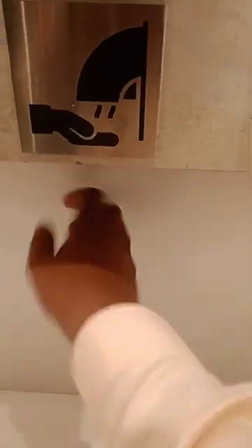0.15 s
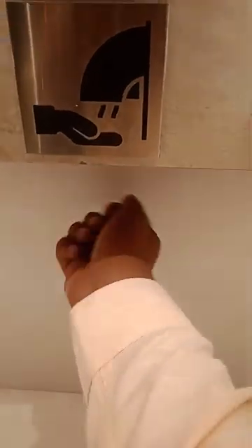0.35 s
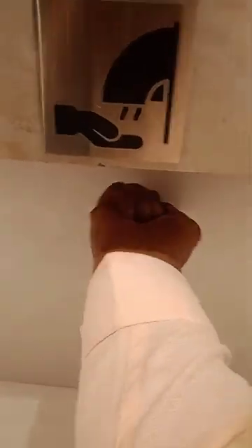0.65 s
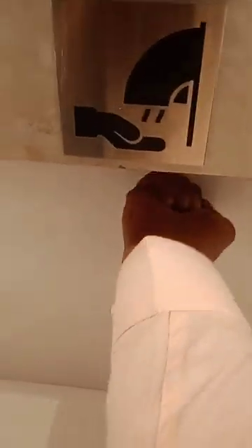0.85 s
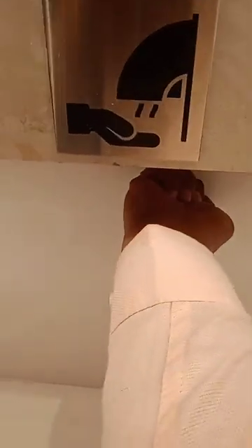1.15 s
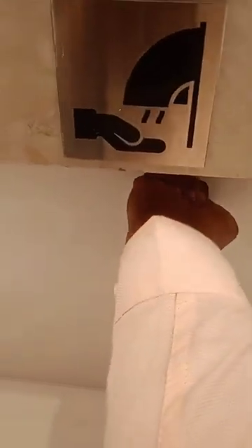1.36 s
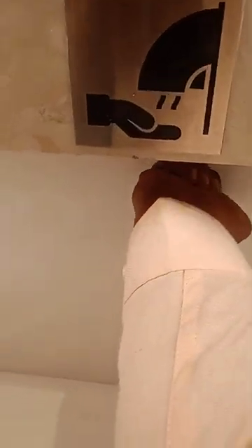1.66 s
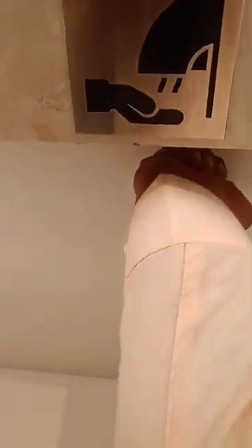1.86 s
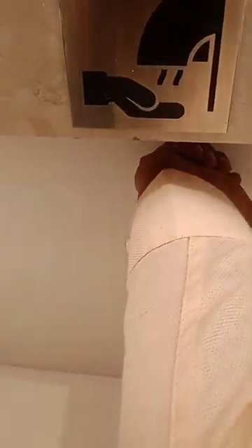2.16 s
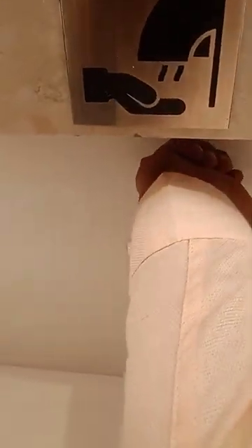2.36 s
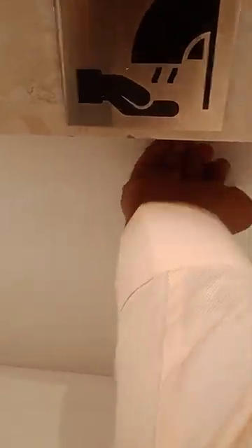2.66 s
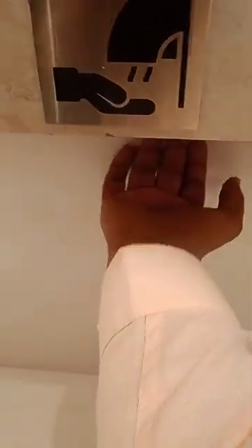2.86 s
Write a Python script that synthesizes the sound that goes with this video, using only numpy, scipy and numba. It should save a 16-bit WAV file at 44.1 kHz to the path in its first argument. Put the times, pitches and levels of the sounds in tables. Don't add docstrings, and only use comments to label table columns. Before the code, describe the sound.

Hand dryer starting up: low hum and rising fan whine, swelling rush of air, then a steady roar with hollow tones and gusts as a hand moves beneath it; close phone microphone, short tiled echo.

```python
import sys
import numpy as np
from scipy import signal
from scipy.io import wavfile
from scipy.ndimage import uniform_filter1d
from numba import njit

SR = 44100
rng = np.random.default_rng(int(sys.argv[2]) if len(sys.argv) > 2 else 0)


def generate_wav(sig):
    pcm = np.round(np.clip(np.atleast_2d(sig).T, -1, 1) * 32767).astype(np.int16)
    wavfile.write(sys.argv[1], SR, pcm)


def invert_db(x):
    u = np.asarray(x, float) / 20
    return 10 ** u


N = 133182
TIME_S = np.arange(N) / SR
FULL_HZ = 429.5
BLADES = 9


def unit(x):
    return x / np.sqrt(np.mean(x ** 2))


@njit
def bandpass(x, hz, width):
    y, band, low = np.empty(len(x)), 0., 0.
    for i in range(len(x)):
        g, k = np.tan(np.pi * hz[i] / SR), width / hz[i]
        v = (band + g * (x[i] - low)) / (1 + g * (g + k))
        band, low, y[i] = 2 * v - band, low + 2 * g * v, k * v
    return y


def ringing(hz, width):
    return unit(bandpass(rng.standard_normal(N), np.zeros(N) + hz, float(width)))


def walk(rate):
    hold = int(SR / rate)
    steps = np.repeat(rng.standard_normal(N // hold + 1), hold)
    slewed = uniform_filter1d(uniform_filter1d(steps, hold), hold)
    return 2 * np.tanh(.7 * slewed[:N])


def curve(table, column):
    rows = np.array(table, float)
    return uniform_filter1d(np.interp(TIME_S, rows[:, 0], rows[:, column]), size=800, mode="nearest")


def swell(peak_s, length_s):
    return np.cos(np.pi / 2 * np.clip((TIME_S - peak_s) / length_s, -1, 1)) ** 2


def resonances(table, flicker_db, drift):
    out = 0
    for hz, width, db in table:
        level = invert_db(db + flicker_db * walk(9.91))
        out = out + level * ringing(hz * (1 + drift * walk(3.0)), width)
    return unit(out)


# time_s [s], shaft_hz [Hz]
SPIN_UP = [(0, 175), (.1, 226), (.2, 268), (.28, 295), (.36, 318), (.44, 338), (.52, 358), (.6, 374),
           (.7, 389), (.8, 400.5), (.9, 409), (1.0, 416), (1.2, 422.5), (1.4, 427), (1.6, 427.3),
           (1.9, 428.7), (2.3, 429.3), (3.02, 429.7)]


def shaft_speed():
    return curve(SPIN_UP, column=1)


def air_speed(shaft):
    stall_share = 0.27
    return np.clip(shaft / FULL_HZ - stall_share, .01, 1) / (1 - stall_share)


# pitch_hz [Hz], level_db [dB per Hz], growth [power of speed]
ROAR_BANDS = [
    (60, -29, 0.74),
    (323, -14.5, 0.44),
    (614, -11.5, 0.7),
    (1500, -14.5, 2.1),
    (2880, -20, 1.03),
    (5100, -25.5, 0.72),
    (6200, -26, 0.84),
    (7700, -29.5, 0.91),
]


def roar(speed):
    rows, out, common = np.array(ROAR_BANDS), 0, walk(2.8)
    log_hz = np.log(rows[:, 0])
    for hz in 60 * 2 ** (np.arange(22) / 3):
        db = np.interp(np.log(hz), log_hz, rows[:, 1])
        power = np.interp(np.log(hz), log_hz, rows[:, 2])
        centre = np.full(N, hz)
        band = bandpass(bandpass(rng.standard_normal(N), centre, hz / 3), centre, hz / 3)
        out = out + invert_db(db + .4 * common + .8 * walk(9)) * band * speed ** (2 * power)
    at_speed = np.sqrt(np.mean(out[N // 2:] ** 2))
    return invert_db(-35.5) * out / at_speed


# pitch_hz [Hz], width_hz [Hz], level_db [dB]
CASING_MODES = [(349.2, 25, -8.5), (435, 47, -6), (490, 21, -8.5), (521.4, 28, -5), (733, 44, -3),
                (819, 37, -5.5), (913, 77, -6.5), (1062, 210, -4.5), (1176, 58, -4), (1347, 14, -13),
                (3480, 72, -16.5), (4304, 250, -13), (5500, 450, -15.5)]


def casing(speed, splash_db):
    level = invert_db(-34 + 0.26 * splash_db)
    return level * speed ** (2 * 1.14) * resonances(CASING_MODES, flicker_db=2.5, drift=.004)


def shaft_angle(shaft):
    waver = .0006 + .02 * (1 - shaft / FULL_HZ)
    return 2 * np.pi * np.cumsum(shaft * (1 + waver * walk(40))) / SR


# time_s [s], level_db [dB]
BLADE_LEVEL = [(.17, -72), (.2, -55), (.25, -55), (.28, -52), (.34, -55), (.37, -60), (.405, -66),
               (.425, -46), (.46, -45), (.485, -52), (.52, -64), (.545, -45), (.64, -45), (.66, -62),
               (.7, -50), (.73, -58), (.76, -48), (.79, -50), (.815, -64), (.85, -50), (.91, -50),
               (.94, -44), (1.025, -45), (1.05, -54), (1.08, -44), (1.18, -49), (1.225, -58), (1.28, -46),
               (1.33, -46), (1.355, -56), (1.39, -48), (1.45, -53), (1.485, -46), (1.53, -48), (1.555, -60),
               (1.585, -43), (1.62, -41.5), (1.685, -43), (1.71, -53), (1.77, -44), (1.87, -46),
               (1.92, -58), (1.99, -58), (2.04, -47), (2.2, -46), (2.29, -39.5), (2.37, -42), (2.43, -46),
               (2.52, -42), (2.62, -42.5), (2.71, -43.5), (2.76, -49), (2.8, -46), (2.85, -49),
               (2.895, -44), (2.92, -62), (2.94, -60), (2.96, -48), (3.02, -50)]


def blade_whine(shaft, angle):
    octave_hz, octave_width_hz = 5160, 180
    off_peak = 2 * (2 * BLADES * shaft - octave_hz) / octave_width_hz
    octave = invert_db(-2) / (1 + off_peak ** 2)
    shortfall = 1 - shaft / FULL_HZ
    lift_db = 6 * np.sqrt(np.clip(shortfall, 0, .1))
    flutter_db = (1 + 8 * shortfall) * walk(55)
    level = invert_db(curve(BLADE_LEVEL, column=1) + lift_db + flutter_db)
    return np.sqrt(2) * level * (np.sin(BLADES * angle) + octave * np.sin(2 * BLADES * angle))


# time_s [s], level_db [dB]
SHAFT_LEVEL = [(.2, -78), (.4, -50), (.8, -56), (1.02, -55), (1.07, -39), (1.12, -45), (1.2, -35),
               (1.24, -41), (1.28, -60), (1.32, -38), (1.44, -35.5), (1.52, -39), (1.56, -36), (1.6, -41),
               (1.68, -35), (1.72, -40), (1.8, -36), (1.88, -42), (2.0, -39), (2.04, -47), (2.08, -37),
               (2.12, -42), (2.16, -36), (2.24, -34), (2.32, -45), (2.4, -41), (2.44, -35), (2.52, -45),
               (2.56, -40), (2.61, -52), (2.69, -40), (2.76, -45), (2.8, -39), (2.84, -43), (2.92, -36),
               (2.96, -49), (3.02, -32)]


def shaft_tone(angle):
    return np.sqrt(2) * invert_db(curve(SHAFT_LEVEL, column=1) + 0.96 * walk(20)) * np.sin(angle)


def motor_hum():
    hum_hz, starting_until_s, after_share = 102.4, .63, 0.9
    fade_in = np.clip(TIME_S / 0.1, 0, 1)
    load = after_share + np.clip((starting_until_s - TIME_S) / .05, 0, 1)
    level = invert_db(-61.5 + .8 * walk(2.9)) * fade_in * load
    return np.sqrt(2) * level * np.sin(2 * np.pi * hum_hz * TIME_S)


# time_s [s], splash_db [dB], draught_db [dB]
HAND_MOVES = [(0, -5.5, -2.5), (.3, -9, 11.5), (.55, 3, 8.5), (.65, 3.5, 6.5), (.95, 4, 5.5), (1.1, 4.5, 7),
              (1.3, 0.5, -2), (1.6, 2, -6.5), (1.9, -7, 0), (2.2, -7.5, -3), (2.47, -4.5, -5),
              (2.55, -10, 3.5), (2.72, -13, 1), (2.87, -24, 7.5), (2.96, -11, 8), (3.02, -2, 13)]


def hand_levels():
    return curve(HAND_MOVES, column=1), curve(HAND_MOVES, column=2)


# pitch_hz [Hz], width_hz [Hz], level_db [dB]
SPLASH_MODES = [
    (1349, 73, -6),
    (1626, 300, -5),
    (1930, 260, -2),
    (2150, 95, -13.5),
    (2253, 60, -5.5),
    (2480, 120, -1.5),
    (2760, 44, -6.5),
    (3600, 2500, -4),
]


def splash(speed, splash_db):
    return invert_db(-37.5 + splash_db) * speed ** (2 * 1.4) * resonances(SPLASH_MODES, flicker_db=1.5, drift=.01)


# time_s [s], pitch_hz [Hz], level_db [dB]
PALM = [
    (.5, 2400, -65),
    (.6, 2570, -41.5),
    (.85, 2394, -41.5),
    (1.15, 2550, -41.5),
    (1.4, 2230, -38.5),
    (1.55, 2030, -37),
    (2.1, 2005, -38.5),
    (2.45, 1934, -37),
    (2.63, 1870, -40),
    (2.75, 1800, -57),
]


def cup():
    level = invert_db(curve(PALM, column=2) + 0.93 * walk(12))
    return level * ringing(curve(PALM, column=1), 223)


# pitch_hz [Hz], width_hz [Hz], level_db [dB]
RUMBLE_MODES = [
    (109, 280, -2.5),
    (160.4, 82, 2),
    (277, 62, 7.5),
]


def draught(speed, draught_db):
    return invert_db(-46.5 + draught_db) * speed ** (2 * 0.9) * resonances(RUMBLE_MODES, flicker_db=3.0, drift=0.025)


# peak_s [s], pitch_hz [Hz], length_s [s, either side of the peak], level_db [dB]
FINGER_GUSTS = [(0.394, 389, .1, -44), (0.698, 306, 0.23, -48.5), (.62, 2294, 0.088, -49),
                (.8, 2020, 0.12, -45), (1.066, 425, 0.068, -38), (1.302, 1084, 0.17, -46),
                (1.447, 347, 0.5, -41.5), (1.56, 2450, 0.28, -43.5), (1.698, 506, 0.56, -39),
                (1.835, 170, 0.15, -47), (2.082, 162.6, 0.052, -52.5), (2.11, 1123, .15, -38.5),
                (2.125, 336, 0.11, -44), (2.253, 1110, 0.07, -39), (2.286, 743, 0.11, -40.5),
                (2.416, 503, 0.09, -40), (2.453, 827, 0.076, -37.5), (2.482, 717, 0.13, -45.5),
                (2.574, 1116, 0.13, -41.5), (2.695, 770, 0.058, -38), (2.76, 499, 0.72, -42.5),
                (2.85, 143, 0.17, -52.5), (2.375, 4430, .16, -57.5), (2.585, 4320, .16, -51),
                (2.877, 4480, 0.16, -47), (1.016, 4460, 0.32, -48.5)]


def gusts():
    out = 0
    for peak_s, hz, length_s, db in FINGER_GUSTS:
        width = 0.23 * hz ** (3 / 4)
        out = out + invert_db(db) * swell(peak_s, length_s) * ringing(hz, width)
    return out


def tiles(air):
    t60_s, top_hz = 0.36, 2090
    lag = np.arange(SR // 2) / SR
    tail = rng.standard_normal(len(lag)) * invert_db(-60 * lag / t60_s) * (lag > .004)
    wet = signal.fftconvolve(air, tail / np.sqrt(np.sum(tail ** 2)))[:N]
    return invert_db(-9) * signal.sosfilt(signal.butter(2, top_hz, fs=SR, output="sos"), wet)


# pitch_hz [Hz], width_hz [Hz], depth [share 0-1]
DIPS = [
    (573, 130, 0.3),
    (2610, 90, 0.3),
    (4130, 150, 0.7),
    (4825, 700, 0.47),
]


def shadows(air):
    for hz, width, depth in DIPS:
        air = air - np.clip(depth, 0, .9) * bandpass(air, np.full(N, float(hz)), float(width))
    return air


def room_tone():
    return invert_db(-58) * ringing(164, 150) + invert_db(-58) * rng.standard_normal(N)


def scene():
    shaft = shaft_speed()
    speed = air_speed(shaft)
    splash_db, draught_db = hand_levels()
    air = roar(speed) + casing(speed, splash_db)
    air = air + splash(speed, splash_db) + cup()
    air = air + draught(speed, draught_db) + gusts()
    air = shadows(air + tiles(air))
    angle = shaft_angle(shaft)
    whine = blade_whine(shaft, angle) + shaft_tone(angle) + motor_hum()
    mono = air + whine + room_tone()
    return np.array([mono, mono])


# peak_s [s], level_db [dB]
SIDE_SWELLS = [
    (2.824, -52.5),
    (2.987, -46),
]


def side_swells():
    level = sum(invert_db(db) * swell(peak_s, 0.021) for peak_s, db in SIDE_SWELLS)
    treble = signal.ellip(6, 1, 80, [4400, 7600], "band", fs=SR, output="sos")
    return level * unit(signal.sosfilt(treble, rng.standard_normal(N)))


def band_limit(x):
    return signal.sosfilt(signal.butter(12, 8500, fs=SR, output="sos"), x)


def record(dry):
    low_cut_hz, top_hz = 70.7, 7276
    x = signal.sosfilt(signal.butter(3, low_cut_hz, "high", fs=SR, output="sos"), dry)
    x = signal.sosfilt(signal.cheby1(9, .3, top_hz, fs=SR, output="sos"), x)
    return band_limit(x + side_swells() * np.array([[1], [-1]]))


dry = scene()
out = record(dry)
generate_wav(out)
```